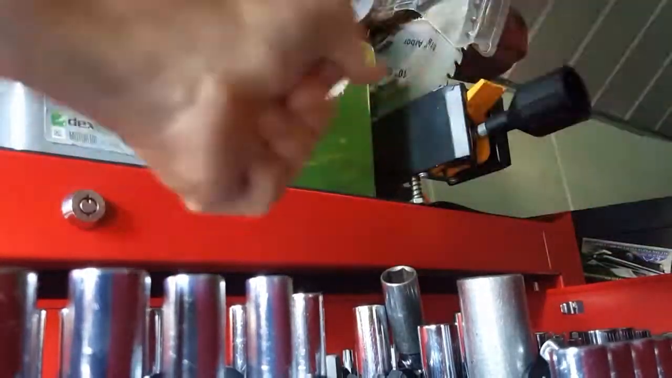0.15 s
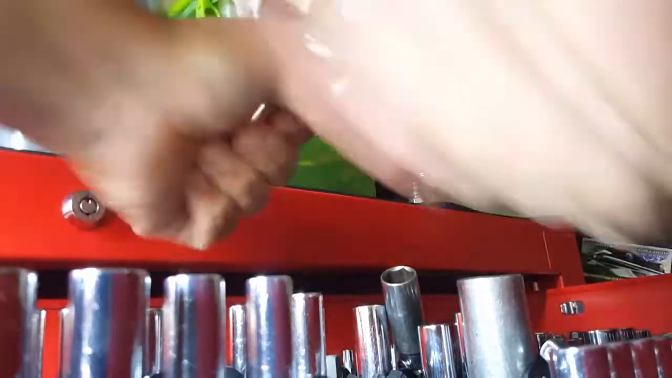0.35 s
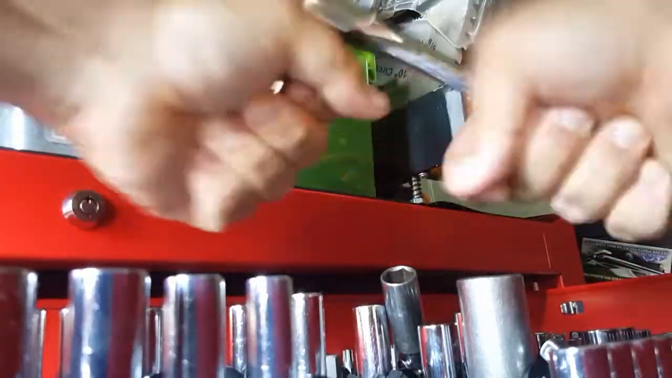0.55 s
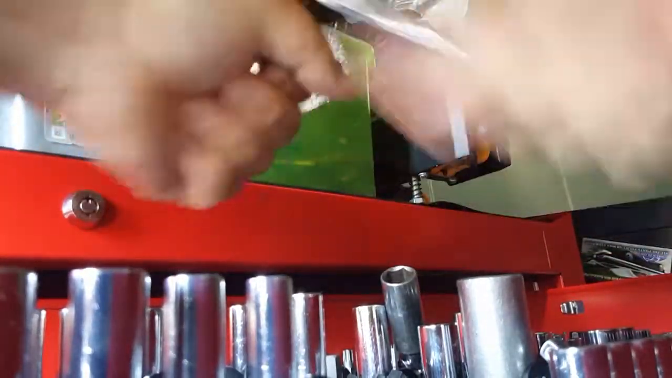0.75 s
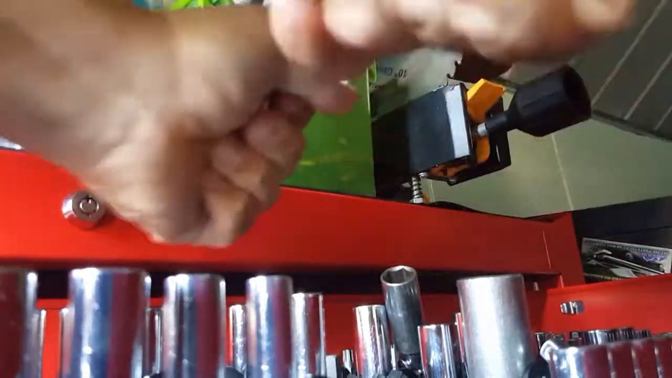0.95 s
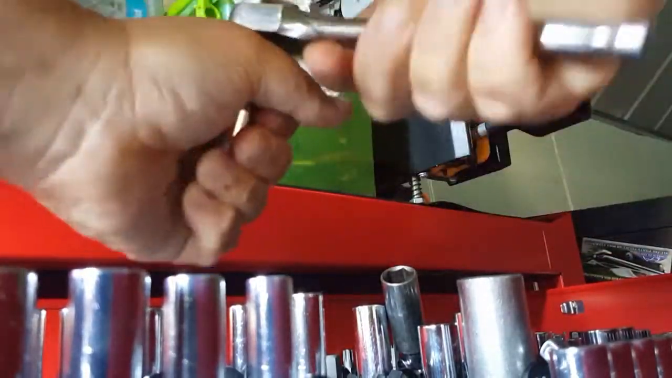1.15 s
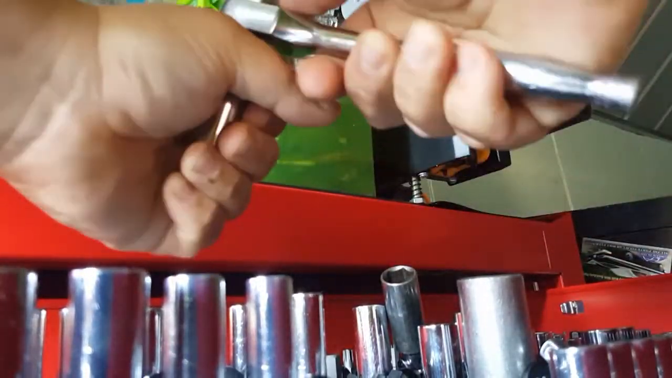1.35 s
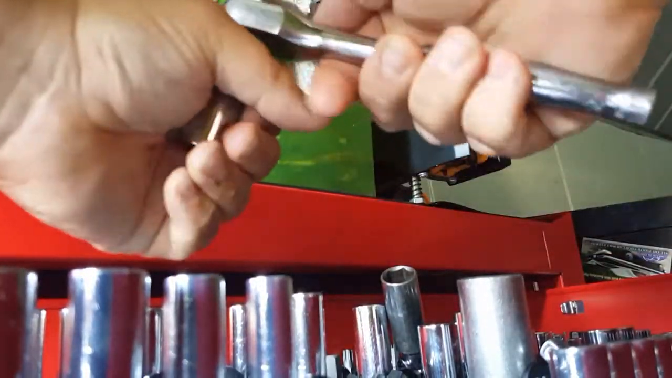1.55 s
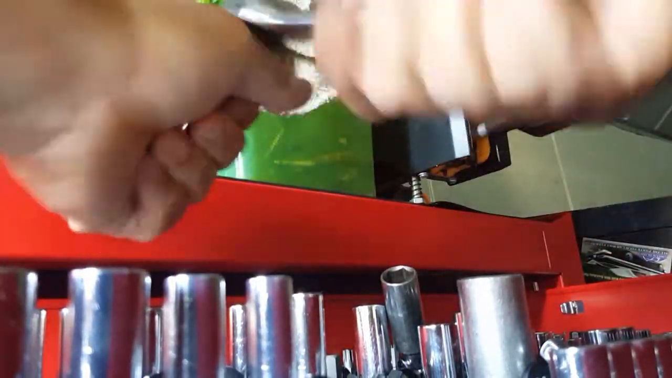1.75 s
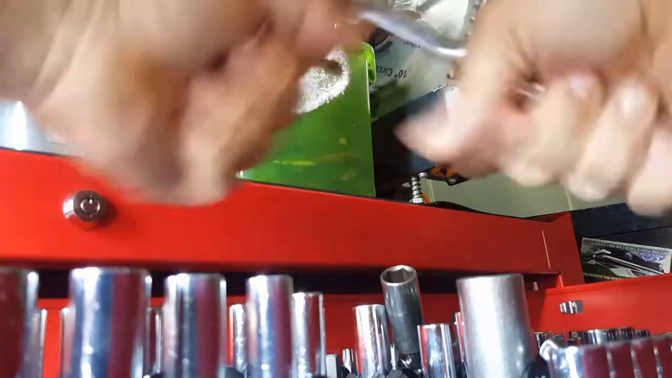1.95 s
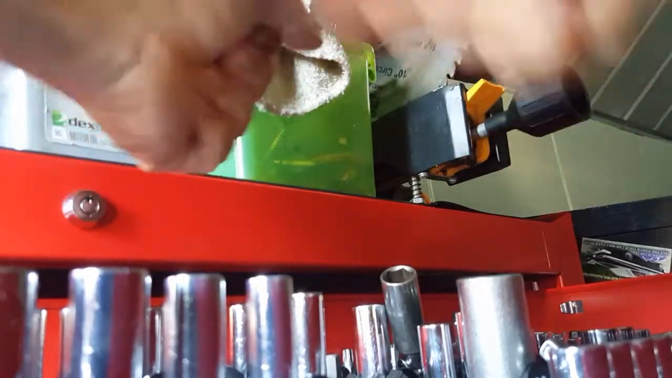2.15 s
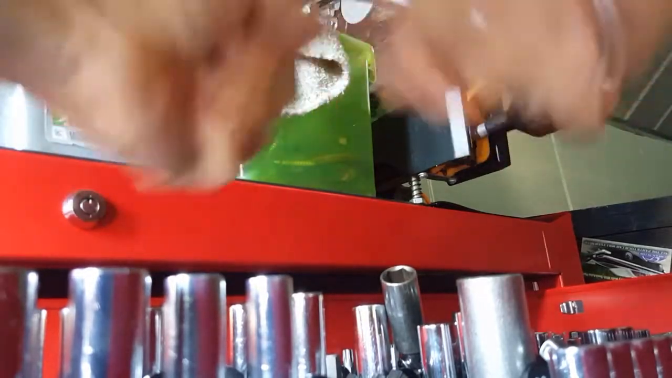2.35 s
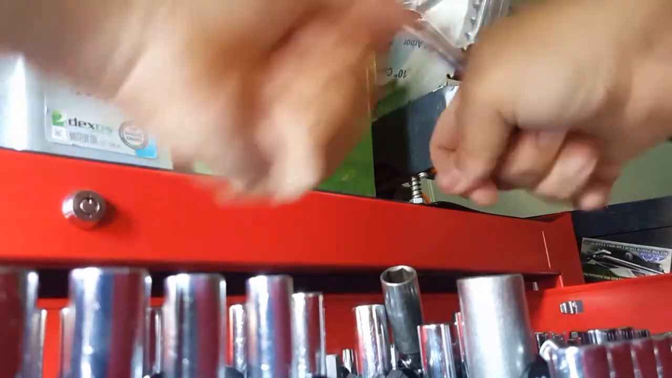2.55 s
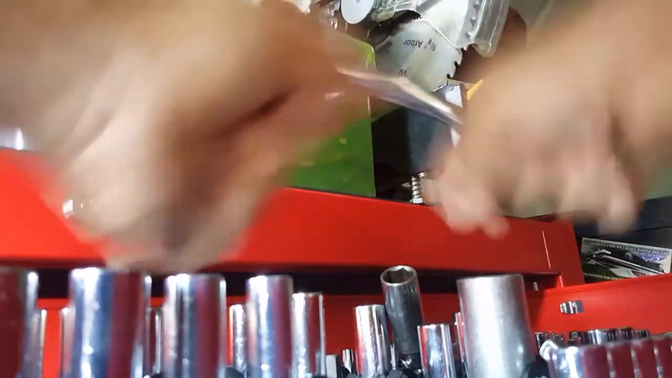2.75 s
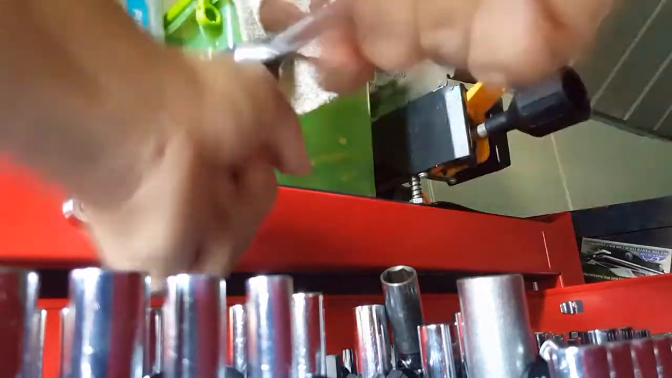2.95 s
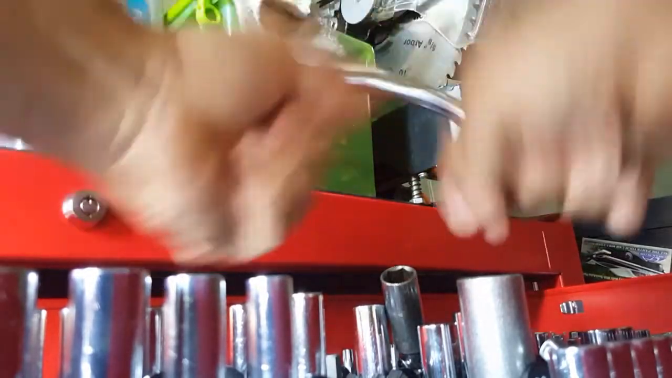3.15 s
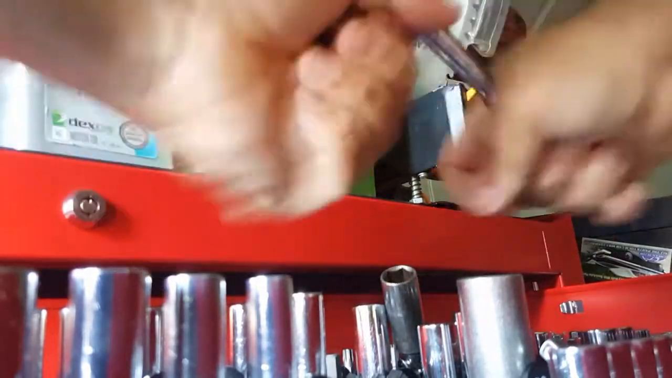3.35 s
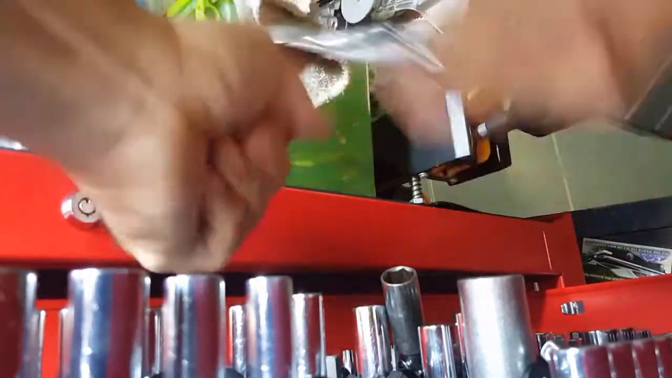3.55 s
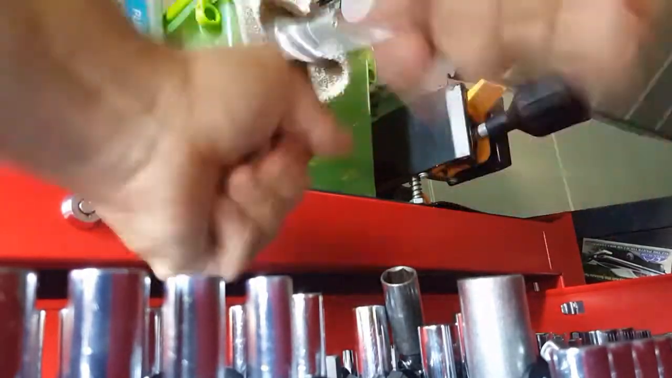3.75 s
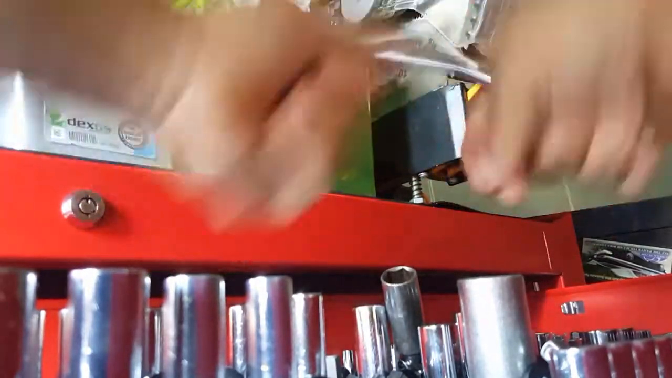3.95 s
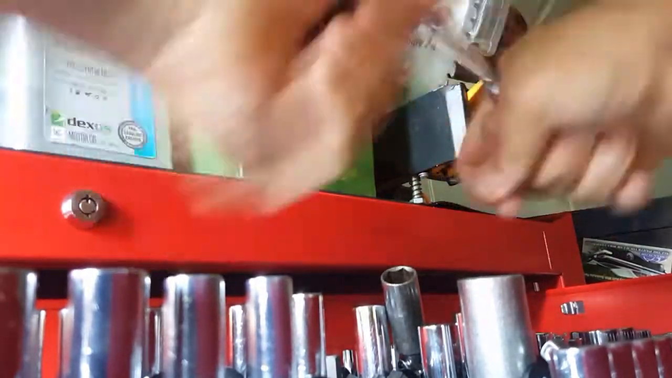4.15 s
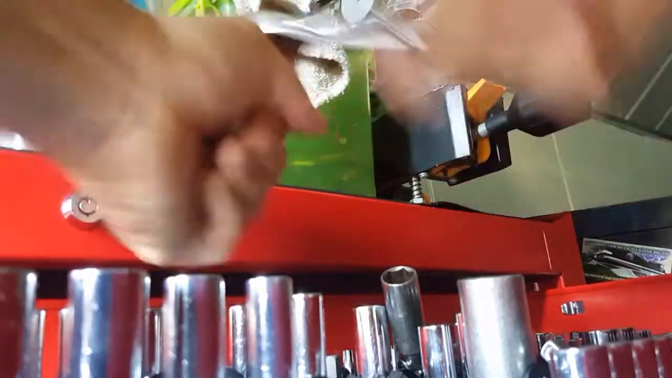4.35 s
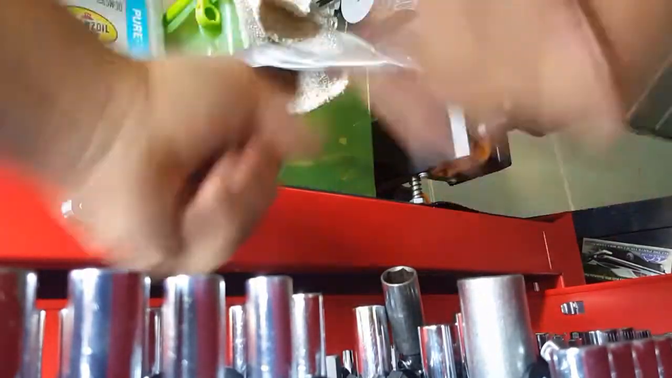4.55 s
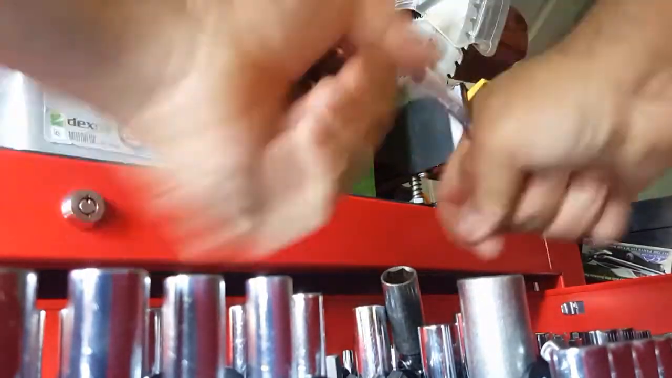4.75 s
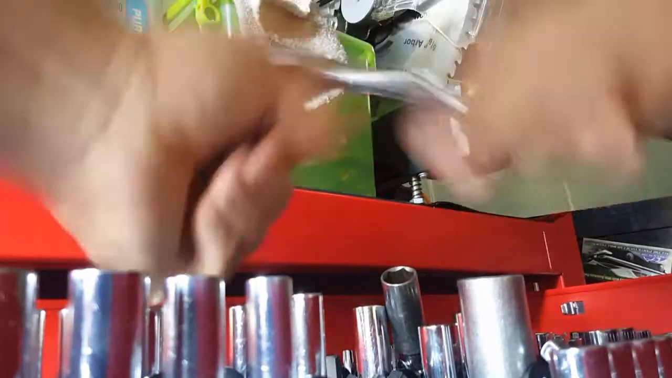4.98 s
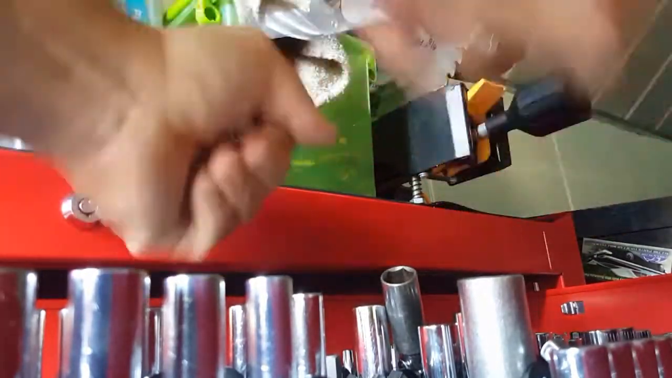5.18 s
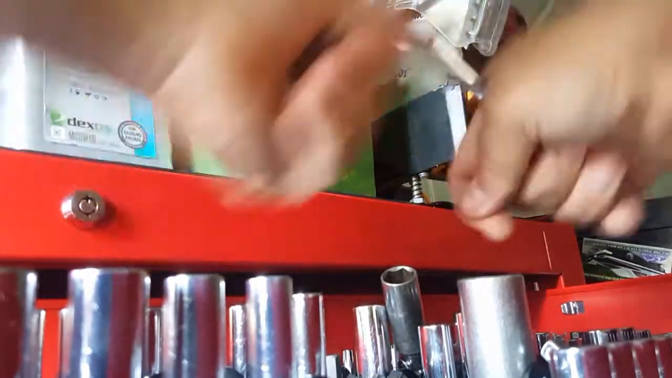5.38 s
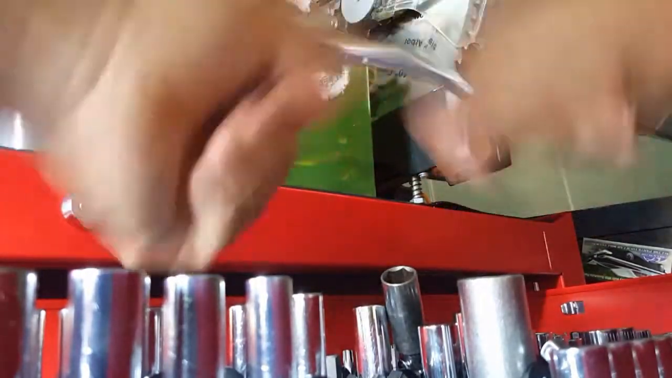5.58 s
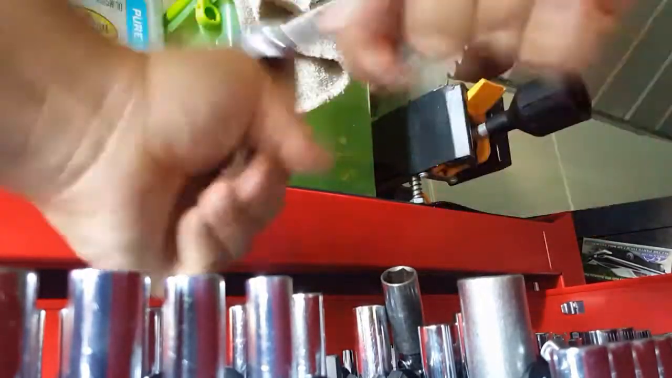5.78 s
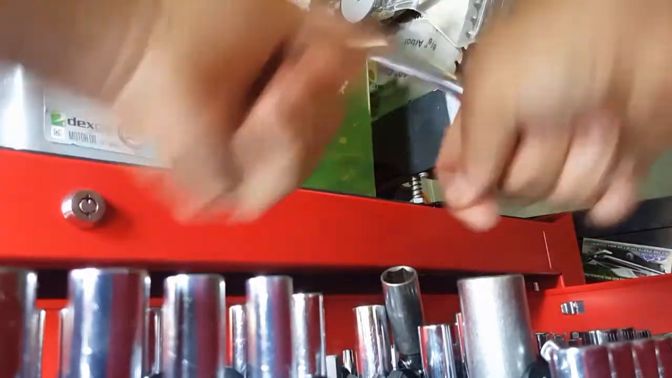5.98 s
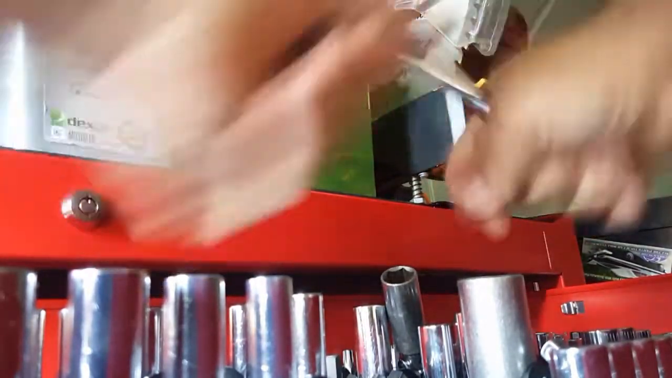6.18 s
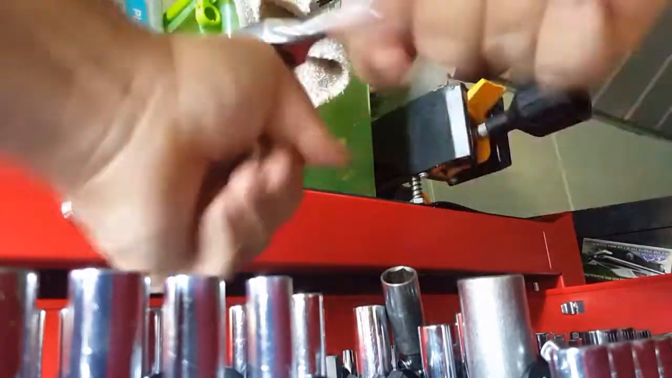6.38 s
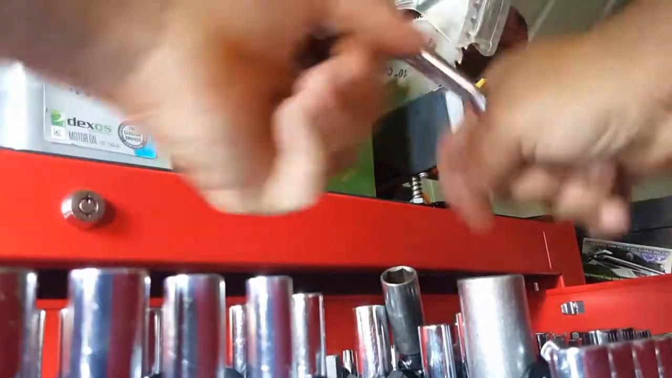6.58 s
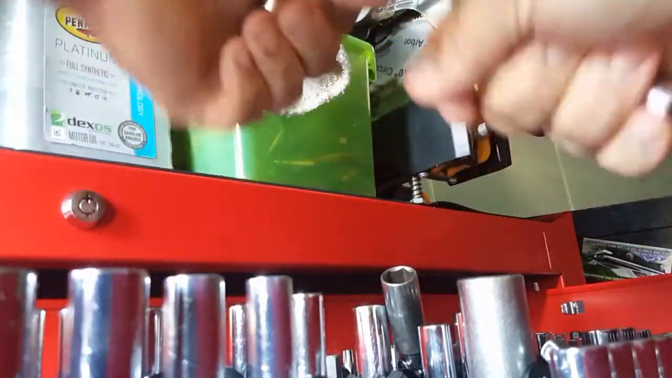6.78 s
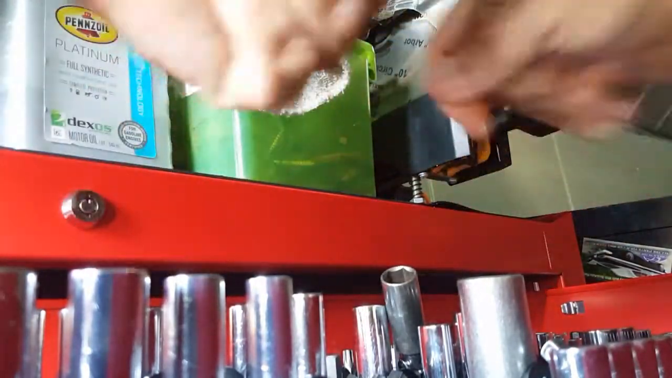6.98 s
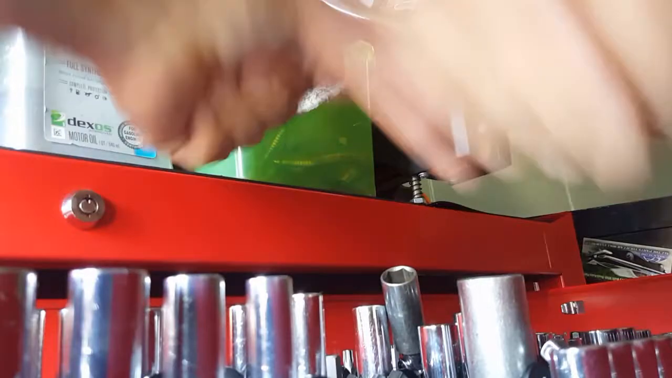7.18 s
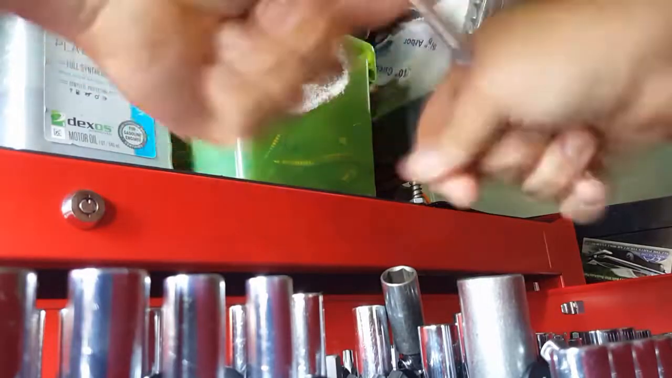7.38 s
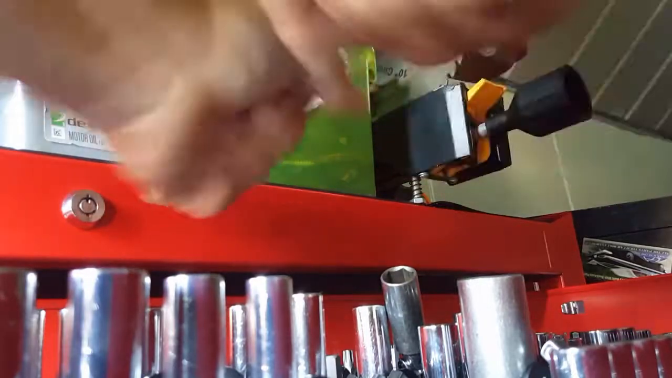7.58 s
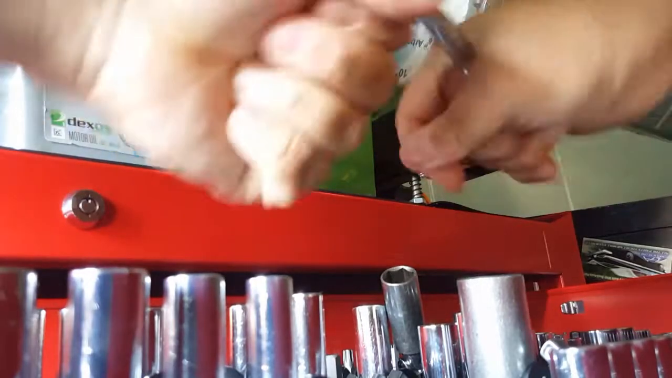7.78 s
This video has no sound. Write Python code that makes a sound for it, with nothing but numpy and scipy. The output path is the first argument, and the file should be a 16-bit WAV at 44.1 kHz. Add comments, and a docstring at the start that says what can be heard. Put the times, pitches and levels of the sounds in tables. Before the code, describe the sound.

A hand ratchet is worked very close to a stereo microphone in a small workshop with short, tight echoes. From 0 to 0.9 s come four brisk zips of about ten bright steel clicks each, with hollow knocks of a loose socket between them. From 1 to 1.75 s it is nearly quiet, just a sharp tick at 1.5; a weaker, slower, gathering run follows at 1.8. From 2.2 to 6.4 s the strokes repeat steadily, almost four per second, each a tiny burst of six to ten clicks slowing and dulling, while dull hollow knocks and faint rattles crowd the gaps. A brief soft puff of air falls at 5.0. Activity stops around 6.55, leaving small ticks. At 7.2 a knock leads a longer run of some twenty clicks; a last bright, fading run comes at 7.6 with knocks. Faint low rumble stays throughout.

```python
"""A small workshop, with a hand ratchet swung to and fro close to a stereo microphone.
The pawl skips over gear teeth in quick runs of clicks: noisy contacts ringing damped steel modes.
The loose socket knocks in the cupped hand: duller contacts ringing a hollow and a low thud.
Shaped noise makes a low outdoor rumble and one gust; decaying sparse echoes make the room."""
import sys
import numpy as np
from scipy import signal
from scipy.fft import rfft, irfft
from scipy.io import wavfile
from scipy.ndimage import uniform_filter1d

SR = 44100
rng = np.random.default_rng(int(sys.argv[2]) if len(sys.argv) > 2 else 0)


def unload_audio(sound):
    """Save the sound as a 16-bit wav file, at the path given as the first command line argument."""
    columns = np.transpose(np.atleast_2d(sound))
    # keep every value between -1 and 1, then stretch to whole-number steps
    steps = np.round(np.clip(columns, -1, 1) * 32767)
    wavfile.write(sys.argv[1], SR, steps.astype(np.int16))


N = 344851

# Distant rumble spectrum. Each row: frequency in Hz, relative density in dB.
RUMBLE_SPECTRUM = [(20, -32.5), (42, -12), (62, -7), (130, -7.5), (220, -6), (380, -14), (460, -7),
                   (520, -16.5), (700, -10.5), (1050, -17), (2500, -32.5), (9000, -46), (14500, -52)]
# Room modes in the rumble. Each row: frequency in Hz, width in Hz, boost in dB.
ROOM_MODES = [(75, 12, 7), (96, 34, 3), (230, 42, 2), (328, 16, 7)]
# Rumble level over time. Each row: time in seconds, level in dB.
RUMBLE_LEVEL = [(0.0, -44), (1.24, -47.5), (5.95, -45.5), (7.62, -47.5), (7.82, -42)]
# Likeness of the rumble in the two channels. Each row: frequency in Hz, correlation from 0 to 1.
RUMBLE_LIKENESS = [(60, 0.88), (240, 0.97), (950, 0.12), (3770, 0.023), (15000, 0.04)]
# Place of the tool in the hands. Each row: time in seconds, relative left-right level in dB.
TOOL_PAN = [(0, -3.5), (2.2, -0.5), (3, -4), (4.1, -3.5), (7, -3), (7.8, 0)]
# Level difference of the microphone ports. Each row: frequency in Hz, left-right level in dB.
PORT_LEVELS = [(250, 3.5), (500, -7), (1000, -10), (2000, -3), (3500, -3), (5000, 4.5), (8000, 0.5),
               (10000, -7.5), (14000, -4.5)]
# Phase difference of the ports. Each row: frequency in Hz, lead of the left in radians.
PORT_PHASES = [(300, 0.4), (550, -1), (1200, 1.14), (1750, 0.83), (3000, 1.54)]
# Jolts of the loose socket. Each row: start in seconds, knock level in dB, hollow pitch in Hz,
# steel tick level in dB, tick brightness in dB.
JOLTS = [(0.0262, -25.5, 1700, -16.5, -9), (0.0557, -12, 813, -37, -1), (0.118, -31.5, 1490, -35, -8),
         (0.2966, -19, 1525, -24, -2), (0.3349, -23.5, 680, -15, -9), (0.3541, -27, 1700, -36, 3),
         (0.3874, -26, 860, -49, -6), (0.4065, -28, 1510, -34, -9), (0.4196, -27, 804, -60, -2),
         (0.549, -53, 910, -56, -15), (0.5735, -22.5, 1530, -17, -2.5), (0.5967, -23, 1680, -48, -5),
         (0.6712, -40, 1500, -30, -14), (0.6785, -23, 1630, -24, -3.5), (0.811, -29, 640, -38.5, -8),
         (0.8348, -17.5, 1550, -18.5, -8), (0.87, -20.5, 810, -36, -9), (0.9416, -24, 1530, -26.5, -10),
         (1.1248, -46, 1000, -39, -1), (1.28, -47, 900, -51.5, -4.5), (1.5172, -26.5, 1360, -13.5, 3),
         (1.748, -26, 1200, -34.5, -13), (1.9679, -28, 1670, -36, -12), (2.036, -36, 950, -52, -6),
         (2.1682, -10, 1560, -14, -2), (2.2844, -28.5, 1600, -35.5, -5), (2.293, -28, 1600, -32.5, -16),
         (2.3227, -26, 940, -43, -6), (2.389, -24.5, 900, -40, -11), (2.4427, -23.5, 774, -10.5, 4),
         (2.4567, -20.5, 1560, -34, -17), (2.5159, -19.5, 1530, -27.5, -14), (2.552, -24, 690, -25, -7),
         (2.6268, -24, 920, -44, -6), (2.7032, -11, 1520, -13.5, -1), (2.7274, -19, 1530, -26, -16),
         (2.7719, -36, 1500, -27, -4), (2.7859, -20.5, 1430, -27.5, -7), (2.811, -27, 1590, -30, -15),
         (2.8439, -27, 990, -29, -9), (2.9585, -22.5, 920, -27, 0), (2.9928, -16, 1590, -42, -4),
         (3.066, -28, 1610, -40, -13), (3.097, -36, 640, -38, -6), (3.1172, -28.5, 840, -46, -2),
         (3.1324, -37, 920, -33, -16), (3.2039, -31.5, 1030, -43, -2), (3.2499, -16.5, 916, -18.5, -1.5),
         (3.385, -25, 1650, -29, -3), (3.402, -29, 920, -63, -8), (3.5165, -25, 1230, -36, -8),
         (3.5329, -17.5, 960, -17.5, 3), (3.5528, -22, 1580, -28, 8), (3.5851, -19.5, 1470, -28, 9),
         (3.6615, -22.5, 920, -25, -10), (3.6884, -21, 1230, -35, -10), (3.727, -33, 1270, -64, -8),
         (3.7562, -30, 1220, -41, -7), (3.8021, -16, 1180, -16.5, -2.5), (3.8235, -15.5, 1420, -32, 6),
         (3.8727, -26.5, 1130, -64, -5), (3.91, -26, 845, -35, -13), (3.9298, -21, 1090, -34.5, -3),
         (3.9505, -27, 1410, -28, -14), (3.9981, -17.5, 1250, -31.5, -2), (4.0615, -20, 1370, -19.5, -3),
         (4.104, -14, 1410, -27, -4), (4.1148, -16.5, 1276, -50, -7), (4.1475, -18, 1190, -23, -2),
         (4.1566, -34, 1650, -29, -8), (4.1835, -22.5, 1630, -34.5, -9), (4.2261, -15.5, 1300, -24.5, -5),
         (4.3467, -13.5, 1324, -16, 2.5), (4.3827, -17, 1330, -38, -4), (4.4279, -14.5, 1290, -29, -7),
         (4.4325, -20, 1490, -30, -7), (4.474, -23.5, 1210, -34, -8), (4.492, -35, 1270, -48, -11),
         (4.5064, -22.5, 1390, -29.5, -8), (4.567, -26.5, 1450, -40.5, 4), (4.6232, -10, 1340, -18, -4),
         (4.6376, -12.5, 1480, -30, 5), (4.676, -19.5, 1400, -26, -4), (4.7066, -17.5, 1180, -31, -12),
         (4.75, -19, 1220, -25.5, -4), (4.7692, -19.5, 1260, -31, 1), (4.8372, -27.5, 1470, -41.5, -10),
         (4.8896, -31, 1300, -62, -12), (4.9134, -12, 1364, -16.5, -2), (4.938, -16, 1500, -15.5, 9),
         (5.0015, -15, 1540, -27, -17), (5.02, -20, 1000, -43, -10), (5.036, -19, 820, -37, -10),
         (5.0485, -29, 1500, -39.5, -4), (5.0724, -21, 1370, -36, -3), (5.0897, -23.5, 1510, -37, -27),
         (5.1367, -26, 1320, -60, -10), (5.148, -21.5, 970, -66, -13), (5.1993, -32, 1300, -38, -7),
         (5.2076, -24.5, 586, -21, 5.5), (5.2495, -15, 1306, -31, -3), (5.2975, -16.5, 1485, -31, -15),
         (5.351, -22, 1150, -29.5, -11), (5.3677, -21.5, 1300, -30.5, -3), (5.4105, -23.5, 1480, -41, -10),
         (5.4425, -26, 1420, -33.5, -3), (5.4962, -16, 1470, -18.5, -3.5), (5.5095, -13.5, 1430, -30, -23),
         (5.561, -27, 1350, -31.5, -8), (5.583, -25, 1280, -36, -12), (5.626, -35, 1310, -37, -10),
         (5.6576, -29, 1300, -38, -6), (5.681, -26, 1450, -36, -10), (5.723, -19, 1400, -29, -6),
         (5.8004, -14.5, 1390, -16.5, -3), (5.8344, -20, 1370, -30, 0), (5.8766, -22.5, 1330, -45, -8),
         (5.8893, -22, 1560, -32, -18), (5.9217, -28, 1540, -32.5, 0), (5.9397, -32, 1250, -54, -8),
         (5.962, -14, 1455, -25, -7.5), (6.0233, -31, 1360, -37.5, -5), (6.0865, -14.5, 1510, -20, -7),
         (6.0929, -26, 1510, -18.5, 25), (6.1219, -15.5, 1360, -39, 3), (6.165, -19.5, 1240, -29.5, -8),
         (6.2098, -14.5, 1460, -31, -18), (6.2276, -46, 1490, -30, -8), (6.2475, -18.5, 1430, -27.5, -15),
         (6.2836, -28, 1520, -60, -11), (6.313, -30, 1470, -37.5, -5), (6.3745, -13, 1480, -17, -1),
         (6.3935, -10, 1490, -16.5, 7), (6.4598, -14, 1390, -33.5, -9), (6.4865, -28.5, 815, -50, -11),
         (6.52, -21.5, 1440, -34, -13), (6.547, -25, 1430, -34, -11), (6.7974, -44, 1330, -45, 5),
         (6.8329, -39, 1510, -22, 7), (6.8565, -36, 1590, -23.5, 2), (6.9326, -51, 1300, -40, 2),
         (6.965, -31, 1420, -27.5, -5), (7.147, -44, 1280, -56, -9), (7.2003, -12.5, 960, -20, -5.5),
         (7.3794, -34.5, 1310, -39, -10), (7.398, -46, 1310, -41, -23), (7.579, -22, 870, -37, -1),
         (7.5911, -16, 1600, -15.5, -2), (7.679, -15, 1570, -22.5, -1), (7.7165, -32, 1610, -35, -4),
         (7.7349, -28.5, 1400, -38, -12)]
# Swings that drag the pawl over the teeth. Each row: first tooth in seconds, last tooth in seconds,
# teeth as a count, slowing at the ends as a factor, level in dB, fade over the run in dB,
# brightness in dB, top treble in dB.
STROKES = [(0.0366, 0.1189, 12, 3, -16.5, -10.5, 1.5, -3.5), (0.3066, 0.3731, 11, 2.2, -17, -7, 5.5, -1),
           (0.5856, 0.6425, 9, 4.5, -20.5, 0, 7.5, -6), (0.8458, 0.9066, 10, 3, -17.5, -4.5, 3.5, -4.5),
           (1.8003, 1.9085, 7, 0.42, -25.5, 2, 3.5, 0.5), (2.1826, 2.2328, 8, 3, -21, -2, 6.5, -10),
           (2.4543, 2.5003, 10, 3, -24, 2, 8.5, -7), (2.7129, 2.7533, 8, 4, -21, -0.5, 6.5, -7),
           (2.9741, 3.0248, 8, 4.3, -15, -13.5, 7.5, -3.5), (3.2695, 3.3103, 7, 1.8, -19, -4, 7.5, -4.5),
           (3.5459, 3.5947, 9, 3.6, -21, -4.5, 8, -6), (3.8137, 3.8577, 8, 3, -18.5, -6, 6.5, -3),
           (4.0727, 4.1158, 8, 1.7, -19.5, -5, 9.5, -5.5), (4.3566, 4.4022, 8, 3, -18.5, -5.5, 7, -2),
           (4.6376, 4.689, 8, 4.9, -19.5, -4.5, 7.5, -3.5), (4.9288, 4.9691, 7, 2, -22, -5, 5, -3),
           (5.2227, 5.2651, 7, 1.9, -18.5, -9.5, 6.5, -4), (5.5095, 5.56, 7, 2, -20, -12, 9, -3.5),
           (5.8146, 5.8507, 6, 2.7, -17.5, -5.5, 6.5, -4), (6.1017, 6.1438, 7, 3, -20.5, -8, 5.5, -6),
           (6.3847, 6.4291, 7, 2.3, -18.5, -6.5, 5.5, -2), (7.2158, 7.3289, 21, 5.4, -17, -7.5, 6.5, -5),
           (7.5987, 7.6662, 14, 4, -14, -12.5, 9.5, -8.5)]
# Broad snap of a tooth. Each row: frequency in Hz, relative level in dB.
TOOTH_SNAP = [(180, -47), (300, -16), (1660, -12.5), (3490, -17.5), (4870, -10.5), (5740, -17.5),
              (8550, -16.5), (10100, -28), (14100, -6.5), (15800, -43.5)]
# Ring of the ratchet head. Each row: frequency in Hz, relative level in dB, T60 in seconds.
STEEL_MODES = [(2050, -6, .025), (3400, -10, .018), (4830, 3, .028), (5600, -5, .016), (6550, -1, .02),
               (7750, -5, .02), (8560, 4, .028), (8950, 1, .026), (12800, -6, .01), (14300, 0, .014)]
# Decay of the workshop echoes. Each row: frequency in Hz, T60 in seconds.
SHOP_DECAY = [(500, 0.053), (1500, 0.13), (5000, 0.11), (9000, 0.08), (15000, 0.062)]

GUST_START_S, GUST_DB, GUST_RISE_S, GUST_HOLD_S, GUST_FALL_S = 4.995, -32, .025, .07, .09
RATTLES, RATTLE_FROM_S, RATTLE_TO_S = 60, 2.2, 7.15
RATTLE_DB, RATTLE_TICK_DB, RATTLE_HZ = -36, -54, 1350
FASTEST_SHARE = .3  # share of the run where the hand is quickest
FIRST_TOOTH_DB, DULLING_DB = -2, -7  # softening of the first tooth, dulling by the last
TOOTH_SCATTER_DB, BRIGHT_SCATTER_DB, TOOTH_SCATTER_S = 2.6, 3, .0003
REBOUND_DB, REBOUND_S = -14, .0028
SCRAPE_PER_DB = .07  # lengthening of a dull contact per dB of lost brightness
LATE_DB, LATE_STRETCH = -27.5, 7.4  # fainter, longer echo from the far walls
EDGE_HZ = 16200

HIT_SIZE, LEAD = 2048, 128  # samples; LEAD keeps what precedes a hit
HIT_HZ, HIT_S = np.fft.rfftfreq(HIT_SIZE, 1 / SR), np.arange(HIT_SIZE) / SR
FRAME_HZ = np.fft.rfftfreq(1024, 1 / SR)
TIME_S = np.arange(N) / SR


def amp(db):
    """Amplitude factor of a level in dB."""
    return 10 ** (np.asarray(db) / 20)


def evened(x):
    """Signal scaled to unit RMS."""
    return x / np.sqrt(np.mean(x ** 2) + 1e-20)


def read(points, at_hz):
    """Value of a spectrum table on a log-frequency axis."""
    hz, value = np.transpose(points)
    return np.interp(np.log(at_hz + 1), np.log(hz + 1), value)


def drifting_lumps():
    """Random field smoothed over frequency and time, so that noise swells in patches."""
    field = rng.standard_normal((N // 256 + 5, 513)).T
    field = uniform_filter1d(field, size=5, axis=0)
    return evened(uniform_filter1d(field, size=10, axis=1))


def shaped_noise(field_db, likeness):
    """Two-channel noise from random short-time spectra."""
    a, b, c, d = rng.standard_normal((field_db.shape[1], 513, 4)).T
    left = a + 1j * b
    right = likeness * left + np.sqrt(1 - likeness ** 2) * (c + 1j * d)
    spectra = np.array([left, right]) * amp(field_db)
    return evened(signal.istft(spectra, nperseg=1024, noverlap=768)[1][:, :N])


def rumble(lumps):
    """Distant traffic and room tone: lumpy noise coloured by a spectrum and room modes."""
    likeness = np.clip(read(RUMBLE_LIKENESS, FRAME_HZ), -1, 1)[:, None]
    noise = shaped_noise(3.08 * lumps, likeness)
    fine_hz = np.fft.rfftfreq(N, 1 / SR)
    colour_db = read(RUMBLE_SPECTRUM, fine_hz)
    for hz, width_hz, boost_db in ROOM_MODES:
        colour_db = colour_db + boost_db / (1 + (2 * (fine_hz - hz) / width_hz) ** 2)
    far = evened(irfft(rfft(noise) * amp(colour_db), N))
    return far * amp(np.interp(TIME_S, *np.transpose(RUMBLE_LEVEL)))


def chatter(count, length_s, rise_s, apart):
    """A contact is a short burst of tiny bounces; the two ports hear it partly by different paths."""
    noise = rng.standard_normal((count, 3, HIT_SIZE))
    both = noise[:, :1] + apart * noise[:, 1:]
    shape = (1 - np.exp(-HIT_S / rise_s)) * np.exp(-(HIT_S / length_s) ** 1.5)
    lag_s = .00006 * noise[:, :1, :1] * [[1], [-1]]  # the moving hands shift the arrival times
    return rfft(both * shape) * np.exp(2j * np.pi * HIT_HZ * lag_s)


def mode(f_hz, hz, t60_s):
    """Response of one damped resonance, 1 at its top."""
    width_hz = np.log(1000) / np.pi / t60_s
    return 1j * width_hz * f_hz / (hz ** 2 - f_hz ** 2 + 1j * width_hz * f_hz)


def place(start_s, db, spectra, band_hz):
    """Scales each hit so that its envelope in a band tops at db, pans it and lays it on the time line."""
    ports = amp(read(PORT_LEVELS, HIT_HZ) / 2) * np.exp(.5j * read(PORT_PHASES, HIT_HZ))
    spectra = spectra * np.array([ports, 1 / ports])
    in_band = (HIT_HZ > band_hz[0]) & (HIT_HZ < band_hz[1])
    power = (irfft(spectra * in_band, HIT_SIZE) ** 2).mean(1)
    top = np.sqrt(2 * uniform_filter1d(power, size=80).max(-1))
    pan_db = np.interp(start_s, *np.transpose(TOOL_PAN))
    pan = amp(np.outer(pan_db - pan_db.mean(), [.5, -.5]))
    gain = (amp(db) / top)[:, None] * pan
    hits = np.roll(irfft(spectra, HIT_SIZE), LEAD, axis=-1) * gain[..., None]
    out = np.zeros((2, N + 2 * HIT_SIZE))
    for start, hit in zip(np.round(start_s * SR).astype(int), hits):
        out[:, start:start + HIT_SIZE] += hit
    return out[:, LEAD:LEAD + N]


def jolts():
    """The listed jolts, then faint rattles of the socket at random while the hands are busy."""
    when, size, pitch = rng.random((RATTLES, 3)).T
    scatter_db = 8 * (size - .5)
    faint = np.transpose([
        RATTLE_FROM_S + when * (RATTLE_TO_S - RATTLE_FROM_S),
        RATTLE_DB + scatter_db,
        RATTLE_HZ * (.7 + .5 * pitch),
        RATTLE_TICK_DB + scatter_db,
        np.full(RATTLES, -12.0)])
    return np.vstack([JOLTS, faint]).T


def socket(start_s, db, hz):
    """A dull blow rings the hollow of the hand, a weaker neighbour and a low thud of the palm."""
    luck = rng.standard_normal((len(start_s), 1, 2))
    hz = hz[:, None, None]
    neighbour = mode(HIT_HZ, hz * (1.2 + .12 * luck[..., :1]), .02)
    hollow = mode(HIT_HZ, hz, .018) + .3 * neighbour
    palm_hz = 560 * (1 + .12 * luck[..., 1:])
    thud = amp(-12.5) * mode(HIT_HZ, palm_hz, .017) + amp(-7) * mode(HIT_HZ, 310, .02)
    skin = mode(HIT_HZ, 1200, .0012) ** 2  # cushions the blow
    contact = chatter(len(start_s), .0024, .00045, .17)
    return place(start_s - .0014, db - .8, contact * (hollow + thud) * skin, band_hz=(600, 2400))


def teeth(first_s, last_s, count, slowing, db, fade_db, bright_db, top_db):
    """Times, levels and brightness of one stroke; gaps widen and drops dull as the hand slows.

    The pawl bounces once after each drop. pawl() reads top_db straight from the table."""
    count = round(count)
    luck = rng.standard_normal((30, 4))[:count]
    gaps = 1 + slowing * (np.linspace(0, 1, count - 1) - FASTEST_SHARE) ** 2
    done = np.append(0, np.cumsum(gaps)) / gaps.sum()
    start_s = first_s + (last_s - first_s) * done + TOOTH_SCATTER_S * luck[:, 0]
    gathering = np.clip(1 - done / FASTEST_SHARE, 0, 1)  # the hand still gains speed
    level_db = db + FIRST_TOOTH_DB * gathering + fade_db * done ** .78
    level_db = level_db + TOOTH_SCATTER_DB * luck[:, 1]
    tooth_bright_db = bright_db + DULLING_DB * done ** .65 + BRIGHT_SCATTER_DB * luck[:, 2]
    rebound_s = start_s + REBOUND_S * (1 + .2 * luck[:, 3])
    drops = [start_s, level_db, tooth_bright_db]
    rebounds = [rebound_s, level_db + REBOUND_DB, tooth_bright_db]
    return np.hstack([drops, rebounds])


def pawl(start_s, db, bright_db):
    """Each contact snaps broadly and rings steel modes of varied strength, detuned by the grip."""
    luck = rng.standard_normal((len(start_s), 3, len(STEEL_MODES), 1))
    ring = 0
    for k, (hz, mode_db, t60_s) in enumerate(STEEL_MODES):
        strength = amp(mode_db + 3 * luck[:, :2, k])
        ring = ring + strength * mode(HIT_HZ, hz * (1 + .015 * luck[:, 2:, k]), t60_s)
    level_db, bright_db = db[:, None, None], bright_db[:, None, None]
    drag = 1.5 + SCRAPE_PER_DB * np.clip(-4.5 - bright_db, 0, 15)
    contact = chatter(len(start_s), .0023 * drag, .0005 * drag ** 2, .6)
    ring_gain = amp(.5 + .54 * level_db)  # hard blows ring more
    sound = contact * (amp(read(TOOTH_SNAP, HIT_HZ)) + ring_gain * ring)

    # four bands, each evened before its share is set
    above = [.5 + np.tanh((HIT_HZ - hz) / 450) / 2 for hz in (2900, 7300, 11300)]
    shares = (1 - above[0], above[0] - above[1], above[1] - above[2], above[2])
    parts = [sound * share for share in shares]
    low, middle, treble, top = (p / np.linalg.norm(p, axis=(1, 2), keepdims=True) for p in parts)
    first_s, top_db = np.transpose(STROKES)[[0, -1]]
    top_gain = amp(np.interp(start_s, first_s, top_db))[:, None, None]
    upper = (treble + top_gain * top) / np.sqrt(1 + top_gain ** 2)
    low_gain = amp(-18.5 - .52 * level_db)  # soft blows keep more lows
    sound = low_gain * low + middle + amp(bright_db - 1.06) * upper
    return place(start_s - .0007, db - .6, sound, band_hz=(3000, 15000))


def shop(x):
    """Sparse echoes of random sign, each band dying at its own speed; three sets take turns."""
    out = np.zeros((2, N))
    for k in range(3):
        taps = np.zeros((2, SR // 2))
        jitter = rng.integers(0, 20, (2, (SR // 2 - 201) // 20))
        at = np.arange(200, SR // 2 - 20, 20) + jitter  # one echo per 20 samples
        np.put_along_axis(taps, at, rng.choice([-1., 1.], at.shape), 1)
        hz, lag_s, spectra = signal.stft(taps, SR, nperseg=256)
        fall_db = 60 * lag_s / read(SHOP_DECAY, hz)[:, None]
        decay = amp(-fall_db) + amp(LATE_DB - fall_db / LATE_STRETCH)
        tail = signal.istft(spectra * decay, SR, nperseg=256)[1]
        turn = np.sqrt(2 / 3) * np.cos(np.pi * (7 * TIME_S + k / 3))
        out += signal.fftconvolve(x * turn, tail / np.linalg.norm(tail[0]), axes=1)[:, :N]
    return out


def gust(lumps):
    """Air pushed at the microphone by a hand: a brief swell of low, lumpy noise."""
    slope_db = -10 * np.log10((1 + (FRAME_HZ / 750) ** 3.5) * (1 + (95 / (FRAME_HZ + 1)) ** 6))
    air = shaped_noise(slope_db[:, None] + 4.8 * lumps, .81)
    knots_s = GUST_START_S + np.cumsum([0, GUST_RISE_S, GUST_HOLD_S, GUST_FALL_S])
    knots_db = GUST_DB + np.array([-36, 5, -4.5, -20])
    return air * amp(np.interp(TIME_S, knots_s, knots_db, left=-120, right=-120))


def scene():
    """Mix of the direct clicks and knocks, their echoes, the rumble and the gust."""
    jolt_s, knock_db, hollow_hz, tick_db, bright_db = jolts()
    runs = [teeth(*row) for row in STROKES]
    clicks = pawl(*np.hstack(runs + [[jolt_s, tick_db, bright_db]]))
    knocks = socket(jolt_s, knock_db, hollow_hz)
    echoes = shop(amp(-10) * clicks + amp(-14) * knocks)
    lumps = drifting_lumps()
    return clicks + knocks + echoes + rumble(lumps) + gust(lumps)


def record(dry):
    """The microphone chain rolls off steeply above 14.6 kHz; then the band limit."""
    soft = signal.sosfilt(signal.butter(18, 14600, fs=SR, output="sos"), dry)
    band_limit = signal.firwin(511, EDGE_HZ, window=("kaiser", 9), fs=SR)
    return signal.oaconvolve(soft, band_limit[None], "same")


dry = scene()
out = record(dry)
unload_audio(out)
```